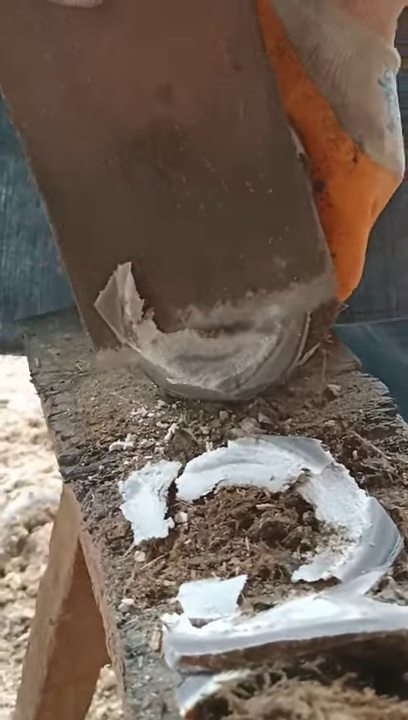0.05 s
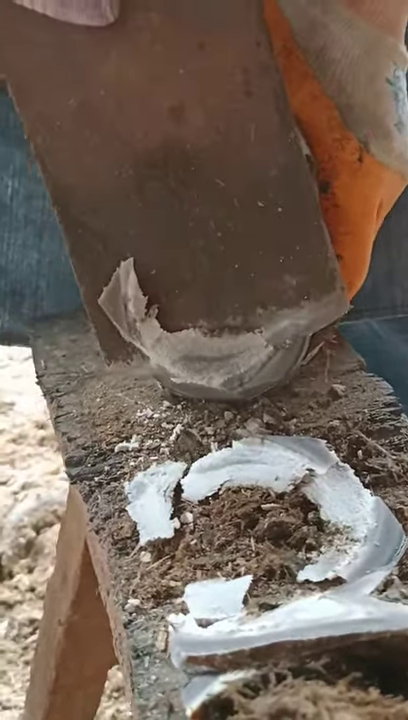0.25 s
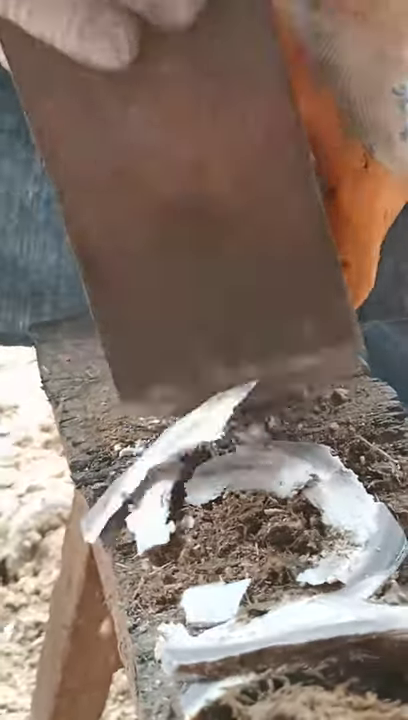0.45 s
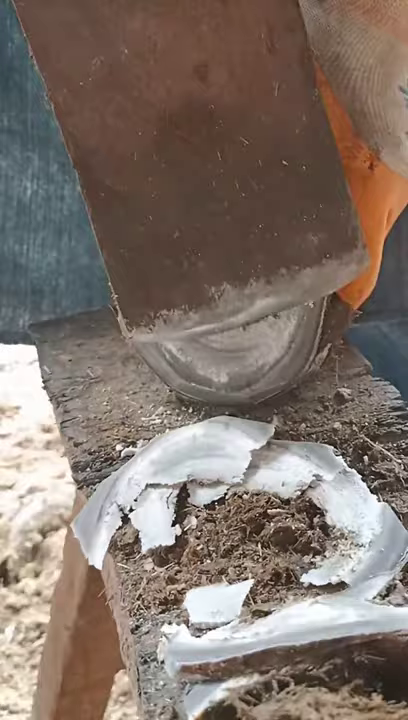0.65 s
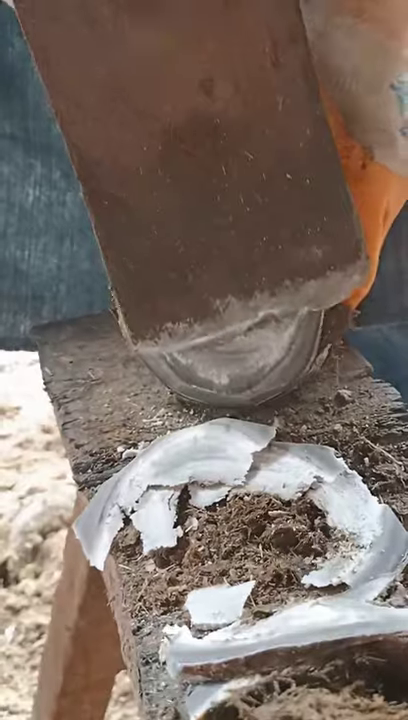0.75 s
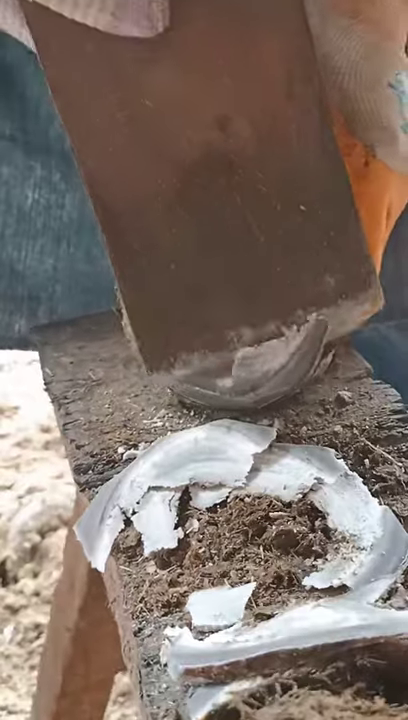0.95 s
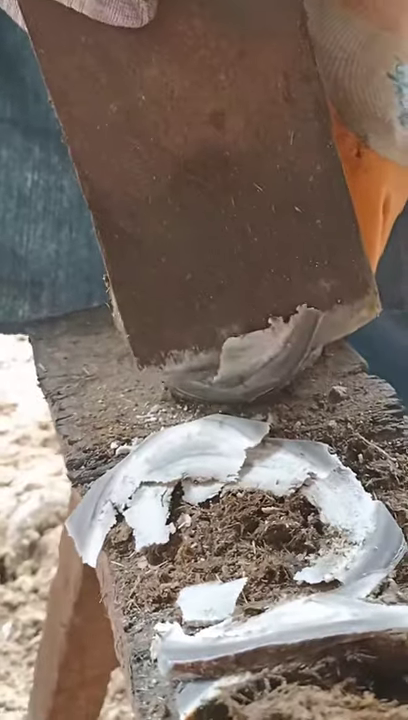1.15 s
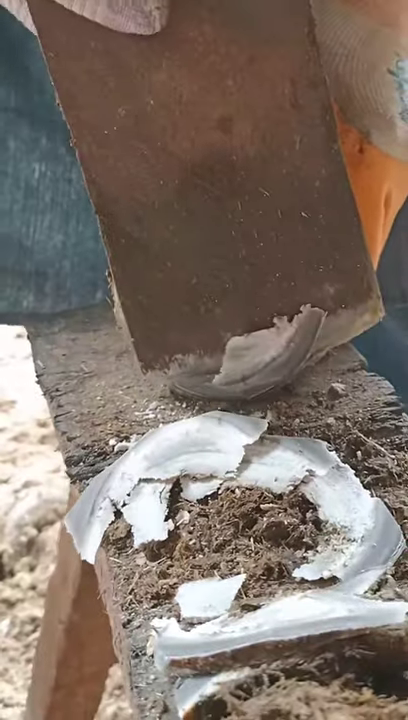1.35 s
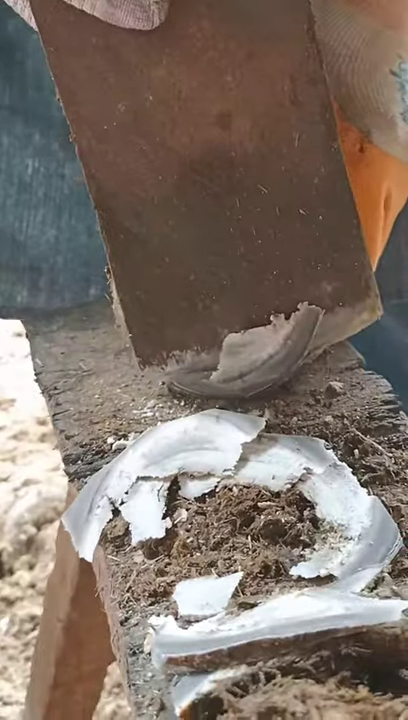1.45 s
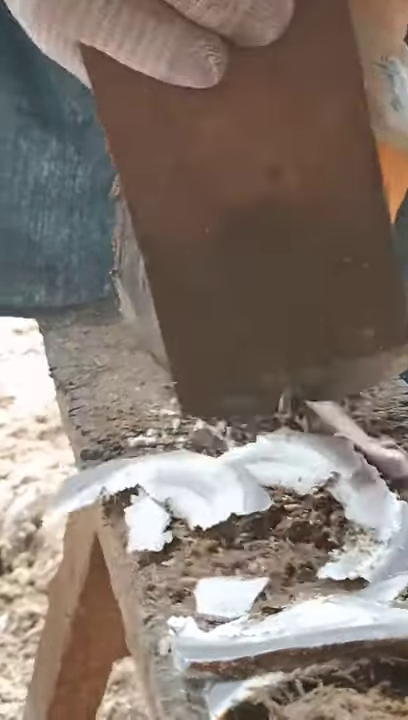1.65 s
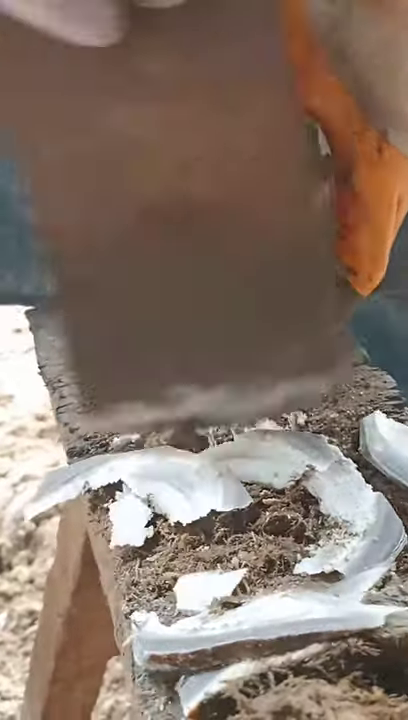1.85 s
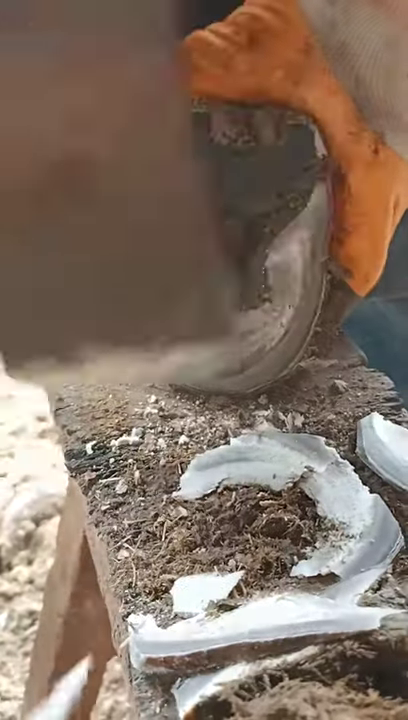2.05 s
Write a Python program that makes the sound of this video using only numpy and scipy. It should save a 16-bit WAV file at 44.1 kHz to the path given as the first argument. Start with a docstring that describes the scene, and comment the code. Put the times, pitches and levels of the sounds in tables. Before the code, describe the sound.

A steel blade scrapes through a dry hoof in short, close pushes. A distant bird faintly whistles two notes at the start, and dull thumps peak around 0.25 seconds. The horn snaps near 0.4, light rasps follow, and the edge squeals briefly at 1.3. At about 1.65 it squeaks, cracks through and knocks the wooden stand. A faint scrape follows, with low outdoor rumble throughout.

```python
"""Outdoors at a wooden hoof stand, a broad steel blade is pushed down through the rim of a hoof.
The edge rasps through dry horn in short pushes, squeals as it sticks and slips, and twice snaps through;
the last cut lands on the stand, which rings and shudders. A bird some way off whistles two notes, once.
Dull thumps, a low rumble and a faint hiss lie underneath."""
import sys
import numpy as np
from scipy import signal
from scipy.fft import rfft, irfft
from scipy.io import wavfile

SR = 44100
rng = np.random.default_rng(int(sys.argv[2]) if len(sys.argv) > 2 else 0)


def log_audio(samples):
    """Write samples as a 16-bit WAV file to the path given in sys.argv[1]."""
    # one column per channel
    frames = np.atleast_2d(samples).T
    # limit to full scale, then quantise
    limited = np.clip(frames, -1, 1)
    pcm = np.round(limited * 32767).astype(np.int16)
    wavfile.write(sys.argv[1], SR, pcm)


N = 92610
T, HZ = np.arange(N) / SR, np.fft.rfftfreq(N, 1 / SR)


def amp(db):
    """Decibels to gain."""
    return 10 ** (np.asarray(db) / 20)


def unit(x):
    """Scales to rms 1."""
    return x / np.sqrt(np.mean(x ** 2) + 1e-20)


def read(points, hz):
    """Reads a curve on a log-frequency axis."""
    f, value = np.transpose(points)
    return np.interp(np.log(hz + 1), np.log(f), value)


def colour(x, db):
    """Applies an EQ curve in dB, then scales to rms 1."""
    return unit(irfft(rfft(x) * amp(db), N))


def noise(db):
    """Noise shaped by an EQ curve in dB, at rms 1."""
    return colour(rng.standard_normal(N), db)


def wander(hz):
    """Smooth random modulation up to about the given rate, at rms 1."""
    return unit(irfft(rfft(rng.standard_normal(N)) / (1 + (HZ / hz) ** 2) ** 2, N))


def since(s):
    """Seconds since an event, zero before it."""
    return np.maximum(T - s, 0)


def reverb(x, decays):
    """A diffuse tail from the surroundings, each band dying at its own speed."""
    hz, t, bands = signal.stft(rng.standard_normal(SR // 2), SR, nperseg=256)
    fade = amp(-60 * t / read(decays, hz)[:, None])
    tail = signal.istft(bands * fade, SR, nperseg=256)[1]
    return signal.fftconvolve(x, tail / np.linalg.norm(tail))[:N]


def background(lumps_db=2, lumps_hz=25, hiss_db=-69.5):
    """The outdoor bed: a lumpy low rumble under a faint, even hiss."""
    # EQ of the rumble and of the hiss: frequency_hz, gain_db
    rumble_eq = [(15, 0), (35, 1), (65, -7), (100, 2), (150, -10.5), (220, -13), (400, -24), (800, -44.5),
                 (3000, -79)]
    hiss_eq = [(30, -5.5), (230, 5.5), (380, 0.5), (700, -9), (1500, -12.5), (3500, -19), (5000, -30),
               (8500, -25.5), (11000, -29.5), (15500, -30)]
    # slow swells of the rumble: time_s, level_db
    swells = [(0, -44.5), (.3, -66), (.65, -59.5), (.92, -65.5), (1.04, -59.5), (1.25, -59.5),
              (1.55, -65.5), (1.75, -58.5), (2.1, -68)]
    rumble = noise(read(rumble_eq, HZ))
    rumble *= amp(np.interp(T, *np.transpose(swells)) + lumps_db * wander(lumps_hz))
    return rumble + amp(hiss_db) * noise(read(hiss_eq, HZ))


def jolt(s, db, hz, swell_s):
    """A heavily damped swing, a cycle or two long."""
    t = since(s)
    return amp(db) * t / swell_s * np.exp(1 - t / swell_s) * np.sin(2 * np.pi * hz * t)


def thumps(knock_top_hz=2000):
    """Soft low thumps and harder, muffled knocks."""
    # soft and hard hits: start_s, level_db, pitch_hz, swell_s
    soft_hits = [(.001, -43.5, 92.8, 0.013), (0.09, -49, 93.6, 0.0084), (0.136, -46, 125, .005),
                 (.180, -35.5, 80, 0.0048), (.199, -32, 101.4, 0.0032), (0.2138, -28.5, 114.2, 0.0073),
                 (0.2446, -19.5, 77.8, 0.0051), (0.284, -45, 98, .005), (0.35, -44, 130, 0.0095),
                 (0.3907, -29, 111, .003), (0.446, -47, 104, 0.0068), (0.484, -48.5, 35.5, 0.017),
                 (0.532, -45.5, 99.6, 0.0062), (.563, -43.5, 112, 0.0048), (1.015, -48, 117, 0.0039),
                 (1.19, -50, 91.5, 0.0051), (1.6494, -25.5, 116, 0.0027)]
    hard_hits = [(0.2287, -34, 220, 0.00062), (0.2441, -18, 270, 0.0004), (1.6447, -23, 291, 0.0016)]
    muffle = signal.butter(2, knock_top_hz, fs=SR, output="sos")
    knocks = signal.sosfilt(muffle, sum(jolt(*hit) for hit in hard_hits))
    return knocks - sum(jolt(*hit) for hit in soft_hits)


def held_note(jitter=0.012, jitter_hz=400, flutter=0.33, flutter_hz=100):
    """The bird's first note: a pure whistle that scoops up and holds, fluttering."""
    # path of the whistle: time_s, pitch_hz, level_db
    contour = [(.019, 2400, -63), (0.026, 3050, -67), (0.028, 3016, -64.5), (.047, 3027, -57.5),
               (.058, 2995, -64), (.072, 3027, -57.5), (0.08, 3010, -66.5), (.091, 3002, -56.5),
               (.107, 3010, -53.5), (0.109, 3000, -73)]
    s, hz, db = np.transpose(contour)
    pitch = np.interp(T, s, hz) * (1 + jitter * wander(jitter_hz))
    tone = np.sqrt(2) * np.sin(2 * np.pi * np.cumsum(pitch) / SR)
    envelope = amp(np.interp(T, s, db)) * (T > s[0]) * (T < s[-1])
    return tone * envelope * unit(1 + flutter * wander(flutter_hz))


def falling_note(width_hz=630):
    """The bird's second note starts higher, sags and frays into a narrow band of noise."""
    # path of the whistle: time_s, pitch_hz, level_db
    contour = [(.110, 3700, -61), (0.114, 3630, -56), (.124, 3280, -57.5), (.146, 3170, -54.5),
               (0.171, 3200, -64.5), (.186, 3000, -63), (0.195, 3330, -65), (.225, 3150, -73.5),
               (0.291, 3100, -83)]
    # crossfade from tone to noise: time_s, noise_share
    fraying = [(.115, 0.45), (.14, 0.49), (.19, 1)]
    s, hz, db = np.transpose(contour)
    fray = np.interp(T, *np.transpose(fraying))
    phase = 2 * np.pi * np.cumsum(np.interp(T, s, hz)) / SR
    band_db = -10 * np.log10((1 + (HZ / width_hz) ** 10) * (1 + (2 * HZ / width_hz) ** 2))
    rough = noise(band_db) * np.sin(phase) + noise(band_db) * np.cos(phase)  # follows the pitch
    tone = np.sqrt(2 * (1 - fray ** 2)) * np.sin(phase) + fray * rough
    return tone * amp(np.interp(T, s, db)) * (T > s[0]) * (T < s[-1])


def bird(reverb_db=-8.5):
    """A two-note call with the long tail of a far source."""
    # decay of the tail: frequency_hz, t60_s
    decays = [(1000, .5), (3000, .55), (6000, 0.26)]
    call = held_note() + falling_note()
    return call + amp(reverb_db) * reverb(call, decays)


def stand(landing_s=1.6475, ring_db=-39, rise_s=0.0011):
    """The wooden stand rings briefly as the blade lands, and shudders dully."""
    # modes of the wood: pitch_hz, gain_db, t60_s
    modes = [(233.2, 1.5, 0.22), (301, -11, 0.092), (394, -2, 0.046), (605, -6.5, 0.042), (980, -4, 0.051),
             (1253, -15, 0.09), (1673, -17.5, 0.067), (2110, -31, 0.064)]
    # shudders after the cut and as the paring drops: start_s, level_db, decay_s
    shudders = [(1.638, -37.5, 0.011), (1.654, -36, 0.0085), (1.688, -50, .014), (1.747, -55, 0.037)]
    # their dull EQ: frequency_hz, gain_db
    shudder_eq = [(40, -9), (120, -4), (240, 2.5), (330, -1.5), (600, -19), (1000, -27), (2000, -37.5),
                  (4500, -47), (15000, -74)]
    t = since(landing_s)
    ring = sum(amp(ring_db + db - 60 * t / t60) * np.sin(2 * np.pi * hz * t) for hz, db, t60 in modes)
    shake = sum(amp(db) * (1 - np.exp(-since(s) / rise_s)) * np.exp(-since(s) / decay)
                for s, db, decay in shudders)
    return ring + shake * noise(read(shudder_eq, HZ))


def blade(edge):
    """The broad steel plate adds a thin, quickly damped ring to what the edge does."""
    # modes of the steel: pitch_hz, gain_db, t60_s
    modes = [(2316, -2.5, 0.055), (3750, -5, 0.14), (6830, -3, 0.15), (7900, 0, .04), (9130, -7, .03)]
    t = T[:SR // 3]
    ring = np.zeros_like(t)
    for hz, db, t60 in modes:
        unity_gain = 2 * np.log(1000) / (t60 * SR)  # cancels the build-up at resonance
        ring += unity_gain * amp(db - 60 * t / t60) * np.cos(2 * np.pi * hz * t)
    return edge + signal.fftconvolve(edge, ring)[:N]


def stick_slip(contour, jitter, jitter_hz, flutter, flutter_hz, overtones_db):
    """The edge sticks and slips at an unsteady rate: a gliding squeal with hoarse overtones."""
    radiate_hz, width_hz = 9350, 1860  # the band where overtones radiate best
    s, hz, db = np.transpose(contour)
    pitch = np.interp(T, s, hz) * (1 + jitter * wander(jitter_hz))
    phase = 2 * np.pi * np.cumsum(pitch) / SR
    overtones = np.zeros(N)
    for k, gain_db in enumerate(overtones_db, 2):
        radiation = (k * pitch < SR / 2) / (1 + ((k * pitch - radiate_hz) / width_hz) ** 2)
        overtones += amp(gain_db) * radiation * np.sin(k * phase)
    tone = np.sin(phase) + overtones * unit(1 + wander(flutter_hz))
    gate = np.exp(-(np.maximum(s[0] - T, 0) + since(s[-1])) / .001)
    envelope = gate * amp(np.interp(T, s, db))
    return np.sqrt(2) * tone * envelope * unit(1 + flutter * wander(flutter_hz))


def squeals():
    """The last cut builds and breaks: a high chirp with strong overtones, then lower, purer squeaks."""
    # three stick-slip glides: time_s, pitch_hz, level_db
    chirp = [(1.280, 5300, -71), (1.2845, 4590, -59.5), (1.288, 3336, -62), (1.293, 3420, -62),
             (1.297, 5590, -81), (1.300, 6860, -54), (1.304, 7080, -56), (1.307, 6930, -50.5),
             (1.310, 5690, -60.5), (1.312, 4340, -49), (1.316, 2845, -47.5), (1.320, 1930, -58),
             (1.324, 1250, -69)]
    squeak = [(1.606, 3600, -66.5), (1.609, 2550, -72), (1.613, 1860, -60), (1.616, 2670, -57)]
    breaking = [(1.6355, 2400, -51), (1.637, 1980, -37), (1.641, 1915, -44), (1.644, 1930, -40.5),
                (1.647, 1860, -72)]
    return (
        stick_slip(chirp, jitter=.04, jitter_hz=1500, flutter=.24, flutter_hz=704,
                   overtones_db=(-.5, -11))
        + stick_slip(squeak, jitter=.06, jitter_hz=1190, flutter=.37, flutter_hz=500,
                     overtones_db=(-10, -30))
        + stick_slip(breaking, jitter=.03, jitter_hz=895, flutter=.091, flutter_hz=587,
                     overtones_db=(-14, -45)))


def snaps(relative_width=.16, skirt_db=-27):
    """The last strip of horn gives way in quick cracks, each ringing around its own pitch."""
    # cracks in the horn: start_s, level_db, decay_s, centre_hz
    cracks = [(0.3751, -48.5, 0.0026, 8000), (0.377, -45, 0.0021, 2290), (0.384, -44.5, 0.0031, 2730),
              (0.3862, -41, 0.0032, 1240), (0.546, -69, 0.0017, 6700), (1.6361, -44.5, 0.0017, 3460),
              (1.6348, -49, .004, 7800), (1.6373, -44.5, 0.0043, 756), (1.636, -52, 0.006, 4260),
              (1.6417, -39.5, 0.0036, 1110), (1.6496, -36, 0.0024, 1720)]
    out = np.zeros(N)
    for s, db, decay, hz in cracks:
        resonance = 1 / (1 + ((HZ - hz) / (relative_width * hz)) ** 2)
        skirt = amp(skirt_db) / (1 + (HZ / (2 * hz)) ** 2)
        fade = (T > s) * np.exp(-since(s) / decay)
        crack = fade * noise(20 * np.log10(resonance + skirt))
        out += amp(db) * crack * np.linalg.norm(fade) / np.linalg.norm(crack)
    return out


def scrapes(grains_per_s=4500, spread_db=3.5, hiss_gain=0.64, judder_db=1.5, judder_hz=121):
    """Each push tears a dense run of tiny horn fibres, swelling and easing with the hand."""
    # pushes of the blade: start_s, peak_s, end_s, level_db, swell_db, fade_db, tilt_db_per_octave
    pushes = [(.085, 0.098, 0.17, -61, 12, 4, -0.5), (.351, 0.379, .389, -58, 4, 9, 2),
              (0.383, 0.392, 0.4274, -55, -3.5, 12, -5), (0.426, .455, 0.53, -83.5, 9, 1, 1.5),
              (0.509, .548, 0.6, -66.5, 7, 2, -3), (.72, 0.774, 0.85, -77.5, -1.5, -6, -2.5),
              (0.808, 0.848, 0.84, -68, 9.5, -5, 0), (1.008, 1.024, 1.044, -60, 6, 2, 0),
              (1.299, 1.31, 1.299, -59.5, 6.5, 1.5, 2), (1.501, 1.512, 1.73, -79, 0, 10, 0.5),
              (1.62, 1.637, 1.698, -49.5, 20, 42, 0.4), (1.79, 1.866, 1.984, -75.5, 3, 7, 1.5)]
    # tone of steel on horn: frequency_hz, gain_db
    horn_eq = [(40, -27.5), (130, -1), (300, 4.5), (550, 5), (750, -1.5), (1300, -5.5), (1950, -2.5),
               (2300, 4.5), (2750, -2), (3800, -1.5), (5000, -13.5), (6500, -9), (9200, -6.5), (11000, -17),
               (15500, -22.5)]
    attack_s, release_s = 0.0047, .01
    octaves = np.log2(np.maximum(HZ, 500) / 3000)
    out = np.zeros(N)
    for start, peak, end, db, swell_db, fade_db, tilt_db in pushes:
        sizes = amp(spread_db * np.minimum(rng.exponential(1, N), 4)) * rng.choice([-1, 1], N)
        grains = unit(sizes * (rng.random(N) < grains_per_s / SR))
        tearing = grains + hiss_gain * rng.standard_normal(N)
        push_db = np.interp(T, [start, peak, end], [db - swell_db, db, db - fade_db])
        force = amp(push_db + judder_db * wander(judder_hz))
        contact = np.exp(-np.maximum(start - T, 0) / attack_s - since(end) / release_s)
        out += force * contact * colour(tearing, read(horn_eq, HZ) + tilt_db * octaves)
    return out


def scene():
    """The cutting with its echoes and tail, over the thumps, the bird and the outdoor bed."""
    # reflections off the stand and the ground: delay_s, gain_db
    echoes = [(.0029, -34), (.0066, -14.5)]
    # decay of the surroundings: frequency_hz, t60_s
    decays = [(100, 0.6), (500, 0.33), (2000, 0.23), (3000, 0.34), (8000, 0.24), (15000, 0.36)]
    cutting = blade(scrapes() + squeals() + snaps()) + stand()
    early = sum(amp(db) * np.pad(cutting, (round(s * SR), 0))[:N] for s, db in echoes)
    tail = amp(-17.5) * reverb(cutting, decays)
    return (cutting + early + tail + thumps() + bird() + background())[None]


def record(dry):
    """A steep low-pass at 15.7 kHz trims the top of the mix."""
    lowpass = signal.firwin(401, 15700, window=("kaiser", 8), fs=SR)
    return signal.oaconvolve(dry, lowpass[None], "same")


dry = scene()
out = record(dry)
log_audio(out)
```